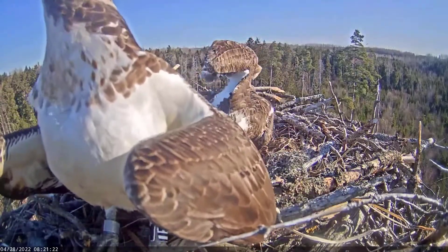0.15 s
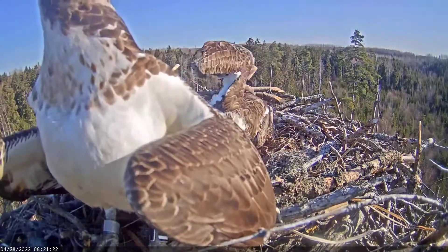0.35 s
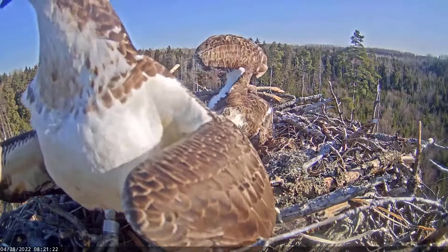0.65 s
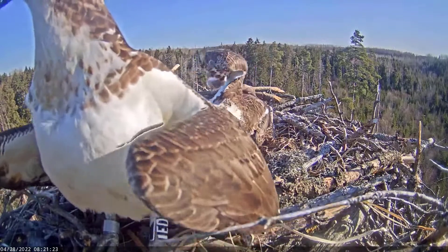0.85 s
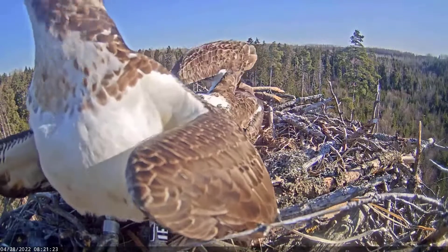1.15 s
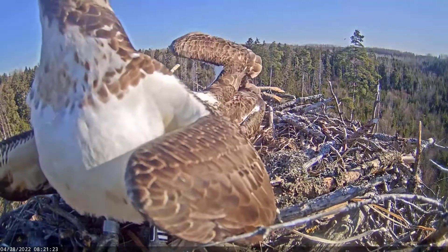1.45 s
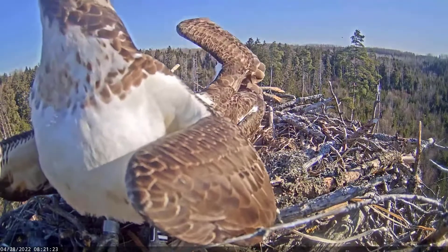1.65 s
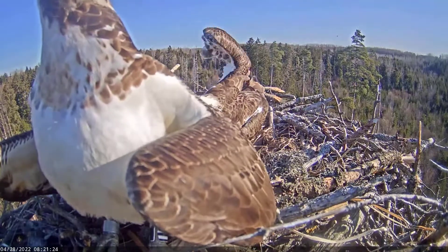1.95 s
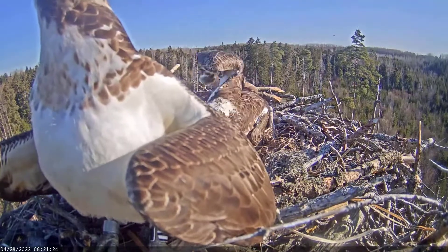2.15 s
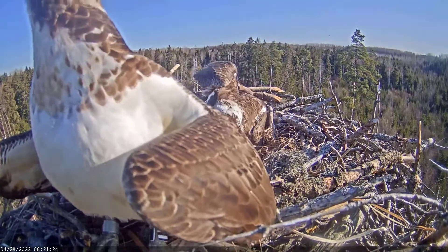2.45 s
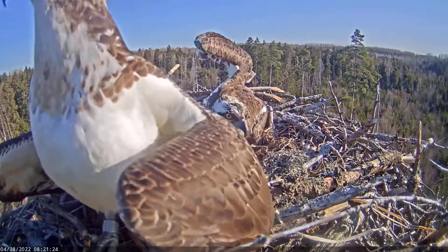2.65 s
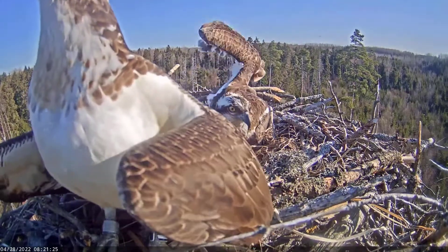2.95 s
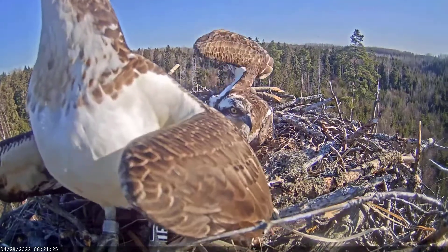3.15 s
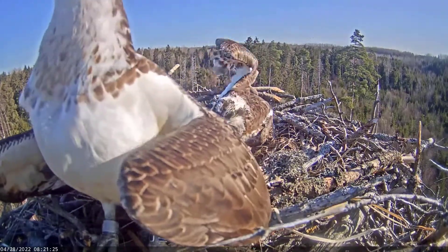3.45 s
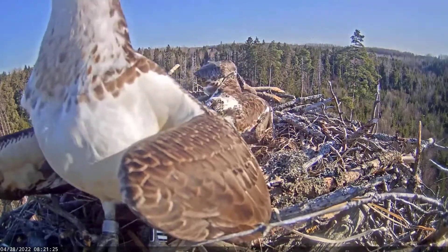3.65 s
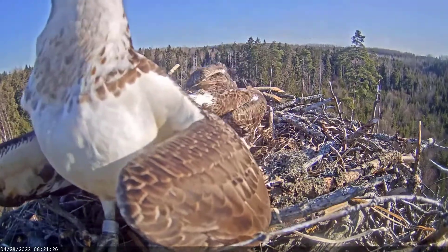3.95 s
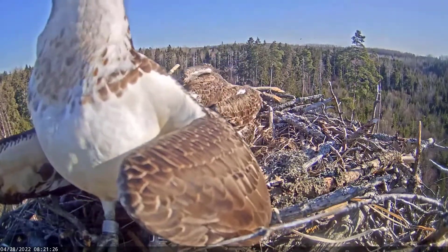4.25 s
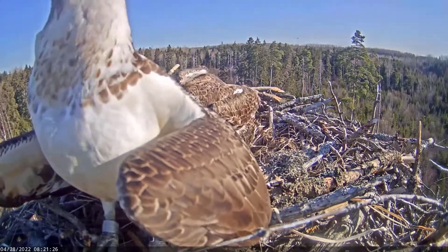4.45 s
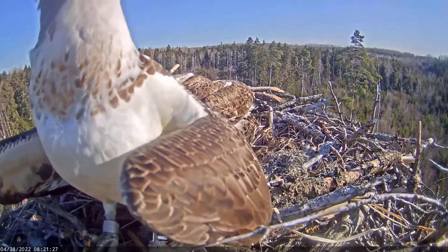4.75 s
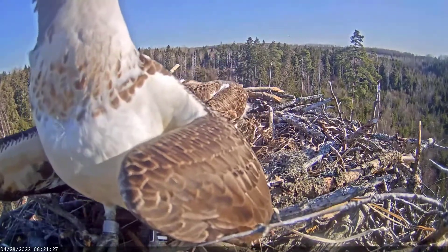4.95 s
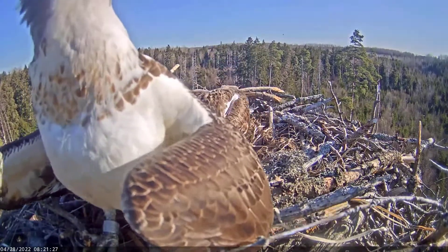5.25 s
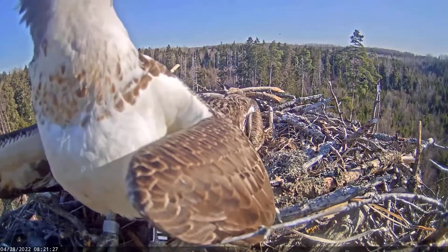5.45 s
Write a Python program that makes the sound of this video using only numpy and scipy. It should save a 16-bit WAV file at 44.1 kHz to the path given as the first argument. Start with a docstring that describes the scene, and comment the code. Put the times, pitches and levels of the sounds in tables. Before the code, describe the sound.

Outdoors on a treetop nest, wind thuds and rumbles on a close microphone, strongest in the first two seconds. A large bird gives a sharp falling whistle near one second, another near 2.65 followed by a softer rising reply, and a last near 4.7. Twigs snap and sticks tap, busiest from about 2.3 to 4.5 seconds, with faint chirps and scattered forest echoes.

```python
"""Ospreys on a treetop nest give sharp falling whistles, each a sliding near-sine tone with a weak octave.
The forest below throws them back as many scattered echoes; fainter notes, mostly small birds, mix in.
Wind buffets the microphone as shaped noise; dry twigs tick and sticks tap in short fading bursts.
A rough change of sample rate, which grabs stored samples as they are, mirrors every whistle."""
import sys
import numpy as np
from scipy import signal
from scipy.io import wavfile
from scipy.ndimage import uniform_filter1d

SR = 44100
rng = np.random.default_rng(int(sys.argv[2]) if len(sys.argv) > 2 else 0)


def wav_out(sig):
    """Save sig, one row per channel (or a flat mono array), as 16-bit PCM at SR to the path in sys.argv[1]."""
    wavfile.write(sys.argv[1], SR, np.round(np.clip(np.atleast_2d(sig).T, -1, 1) * 32767).astype(np.int16))


N = 246959


def gain_of(db):
    """Turn decibels into a plain multiplier."""
    return 10 ** (np.asarray(db) / 20)


def evened(x):
    """Scale a signal to an average (RMS) strength of 1."""
    return x / np.sqrt(np.mean(x ** 2) + 1e-20)


def smooth_random(count, size):
    """Random wandering, smoothed over a number of steps, with an RMS of 1."""
    return evened(uniform_filter1d(rng.standard_normal(count), size))


def read(points, hz):
    """Read a curve of values against pitch, drawn on a logarithmic pitch scale."""
    f, value = np.transpose(points)
    return np.interp(np.log(hz + 1), np.log(f + 1), value)


def add(mix, s, sound):
    """Mix a sound in from time s, cutting off what runs past the end."""
    part = mix[round(s * SR):][:len(sound)]
    part += sound[:len(part)]


def noise(spectrum, size, flicker_db, patchy_db, count=N):
    """Random short-time spectra; all bins flicker together, patches drift on their own."""
    frames, hz = 4 * count // size + 5, np.fft.rfftfreq(size, 1 / SR)
    real, imaginary, patches = rng.standard_normal((frames, len(hz), 3)).T
    patches = uniform_filter1d(patches, size=6, axis=0)  # across pitch
    patches = evened(uniform_filter1d(patches, size=10, axis=1))  # across time
    flicker = smooth_random(frames, 3)
    level_db = read(spectrum, hz)[:, None] + flicker_db * flicker + patchy_db * patches
    z = (real + 1j * imaginary) * gain_of(level_db)
    return evened(signal.istft(z, nperseg=size, noverlap=3 * size // 4)[1][:count])


# the forest's hush, its balance of low and high sound: (frequency [Hz], relative level [dB per Hz])
HUSH_COLOUR = [(180, -45), (300, -18.5), (555, -7.5), (614, -2), (828, -12.5), (1360, -18), (2740, -25),
               (3290, -23), (3640, -26), (3890, -25), (4520, -28), (12500, -30.5), (16000, -55.5)]
HUSH_DB = -66.5


def hush():
    """The forest's quiet, steady background is noise with a fixed colour and small random changes."""
    return gain_of(HUSH_DB) * noise(HUSH_COLOUR, size=1024, flicker_db=0.5, patchy_db=1.35)


RUSTLE_DB, RUSTLES_PER_S = -80, 80  # level of the smallest crackles, average rate


def rustle():
    """Tiny random crackles of the nest lining, a few much larger than the rest."""
    size_db = 3.0 * np.minimum(rng.exponential(1, N), 4)
    starts = gain_of(size_db) * (rng.random(N) < RUSTLES_PER_S / SR)
    fade = gain_of(-60 * np.arange(600) / SR / 0.019)  # 60 dB in 0.019 s
    crackles = signal.oaconvolve(starts, fade)[:N]
    band = signal.butter(2, [1400, 4500], "bandpass", fs=SR, output="sos")
    grit = signal.sosfilt(band, rng.standard_normal(N))
    return gain_of(RUSTLE_DB) * crackles * evened(grit)


TICK_S = 0.005  # time to fall 20 dB
# further faint ticks fall at random while the birds shift their feet
SHIFT_FROM_S, SHIFT_TO_S, FAINT_COUNT = 1.4, 5.1, 12
FAINT_TICK_DB, FAINT_SPREAD_DB = -61.5, 4  # before the lift in ticks(); full spread from faintest to loudest
# the main snaps of dry twigs, before the lift in ticks(): (time [s], level [dB])
TICKS = [(.1698, -58), (0.198, -60), (.545, -55.5), (0.901, -52), (1.465, -53), (1.771, -63), (2.37, -52.5),
         (2.383, -56.5), (2.5453, -57), (2.6207, -55), (2.7497, -58), (2.7686, -55), (2.8586, -48.5),
         (2.864, -51), (2.959, -53), (3.0632, -51.5), (3.072, -56), (3.2224, -56), (3.231, -52),
         (3.316, -57), (3.4203, -54), (3.4817, -48.5), (3.827, -57), (3.835, -55), (4.0857, -50),
         (4.262, -64), (4.319, -66), (4.3866, -55), (4.4134, -56.5), (4.419, -63.5), (4.4613, -60),
         (4.4688, -58), (4.6787, -54.5)]
# balance of low and high sound in a snap: (frequency [Hz], relative level [dB per Hz])
TICK_COLOUR = [(530, -42), (900, -16.5), (1220, -16.5), (2220, -4), (4920, -20), (6640, -11), (9770, -20),
               (11600, -9), (12900, -36.5), (15100, -29), (16000, -57.5)]


def ticks():
    """Dry twigs snap: a bright burst of noise that starts almost at once and dies quickly."""
    out, t = np.zeros(N), np.arange(1024) / SR
    when, size = rng.random((FAINT_COUNT, 2)).T
    when = SHIFT_FROM_S + (SHIFT_TO_S - SHIFT_FROM_S) * when
    faint_db = FAINT_TICK_DB + FAINT_SPREAD_DB * (size - .5)
    for s, db in [*TICKS, *zip(when, faint_db)]:
        snap = noise(TICK_COLOUR, size=128, flicker_db=2.5, patchy_db=2.5, count=1024)
        rise = np.minimum(t / 0.00062, 1)
        add(out, s, gain_of(db + 3.0 - 20 * t / TICK_S) * rise * snap)  # 3 dB lift
    return out


# the knocks of thicker sticks, before roughness: (time [s], level [dB], pitch [Hz])
TAPS = [(1.4651, -56, 1630), (1.7688, -48, 1610), (2.034, -55, 1930), (2.329, -49, 1855), (2.38, -51, 1820),
        (2.483, -48.5, 1930), (2.6193, -50, 1810), (2.7492, -42, 2200), (2.768, -52, 1530),
        (3.1138, -57, 1820), (3.1348, -57.5, 1790), (3.2221, -42.5, 1840), (3.423, -49, 1910),
        (3.4535, -51.5, 1770), (3.5598, -48, 1740), (3.5788, -47, 1830), (3.6345, -49, 1900),
        (3.697, -48.5, 2130), (3.705, -46, 1590), (3.8082, -58, 1680), (3.829, -50, 1800),
        (3.849, -44.5, 1630), (3.8794, -50, 1490), (3.929, -50, 1740), (3.9903, -49, 1750),
        (4.0323, -46, 1810), (4.0846, -46, 1880), (4.1607, -45.5, 1736), (4.229, -55, 1900),
        (4.3166, -52.5, 1400), (4.3818, -44.5, 1810), (4.413, -58, 1870), (4.73, -51, 1590)]


def taps():
    """Thicker sticks give a short hollow tap: a roughened sine that falls 60 dB in 0.015 s."""
    out, t = np.zeros(N), np.arange(1024) / SR
    for s, db, hz in TAPS:
        rough = .75 + .35 * smooth_random(len(t), 20)
        rise = np.minimum(t / .0008, 1)
        add(out, s, gain_of(db - 60 * t / .015) * rise * rough * np.sin(2 * np.pi * hz * t))
    return out


EDDY_DB, EDDY_S = 1.5, 0.042  # passing eddies lift and drop the whole wind; smoothing time
# strength of the wind before the eddies: (time [s], buffeting level [dB], flutter level [dB])
GUSTS = [(0, -30, -41), (.06, -21.5, -50.5), (.2, -27, -40.5), (.34, -23.5, -42), (.41, -20, -40),
         (.47, -25, -44), (.62, -25.5, -45), (.83, -25, -38.5), (1.0, -28.5, -36), (1.17, -26.5, -38.5),
         (1.31, -22.5, -38), (1.42, -25.5, -41), (1.61, -28.5, -45.5), (1.78, -21.5, -42.5),
         (1.839, -31.5, -43.5), (1.96, -22.5, -43.5), (2.07, -29, -47), (2.19, -24, -42.5),
         (2.3, -30.5, -48), (2.43, -27, -45.5), (2.58, -32.5, -51.5), (2.72, -29, -46), (3.12, -33, -52.5),
         (3.22, -31.5, -48), (3.35, -31.5, -52), (3.48, -29, -51), (3.63, -35, -57.5), (3.82, -30.5, -48),
         (4.051, -30.5, -49.5), (4.14, -27, -43), (4.46, -35, -54.5), (4.6, -27, -56), (4.69, -38.5, -52),
         (4.86, -37, -60), (5.08, -37.5, -63.5), (5.16, -44.5, -63), (5.6, -43, -62.5)]
# balance of the low buffeting: (frequency [Hz], relative level [dB per Hz])
BUFFET_COLOUR = [(4.7, -38.5), (8.0, 2.5), (21, 3), (35, 0.5), (124, -12), (254, -37), (300, -37),
                 (390, -61), (660, -120)]
# balance of the flutter above it: (frequency [Hz], relative level [dB per Hz])
FLUTTER_COLOUR = [(71, -26), (120, 3.5), (254, -14), (396, -18), (738, -34), (817, -34), (1820, -49.5),
                  (2200, -49.5), (2500, -53.5), (3250, -80.5), (5500, -120)]


def wind():
    """Eddies push the microphone's membrane in slow lumps; the flutter above comes in short puffs."""
    gust_s, *levels = np.transpose(GUSTS)
    buffet_db, flutter_db = (np.interp(np.arange(N) / SR, gust_s, level) for level in levels)
    span = int(EDDY_S * SR)
    eddies_db = EDDY_DB * evened(uniform_filter1d(smooth_random(N, span), span))
    lumps = noise(BUFFET_COLOUR, size=4096, flicker_db=0.0, patchy_db=1.5)
    puffs = noise(FLUTTER_COLOUR, size=512, flicker_db=3.5, patchy_db=1.0)
    return gain_of(eddies_db) * (gain_of(buffet_db) * lumps + gain_of(flutter_db) * puffs)


# single slaps of wind on the microphone, before the cut in slaps(): (time [s], level [dB])
SLAPS = [(0.034, -32), (0.082, -31), (0.173, -28), (0.302, -31), (0.345, -25.5), (0.403, -21.5),
         (0.608, -26.5), (0.829, -26), (1.233, -27), (1.433, -32), (1.465, -25), (1.53, -29.5),
         (1.575, -35.5), (1.766, -26), (2.099, -46), (2.142, -29.5), (2.702, -24), (3.211, -51),
         (3.704, -39), (3.95, -30.5), (4.007, -40.5), (4.319, -40)]
# balance of low and high sound in a slap: (frequency [Hz], relative level [dB per Hz])
SLAP_COLOUR = [(60, -12), (200, 6.5), (500, -3), (900, -19), (1600, -34), (3000, -38), (8000, -49)]


def slaps():
    """Each slap of wind is a short dull burst of noise, sharp in front, falling 60 dB in 0.021 s."""
    out, t = np.zeros(N), np.arange(1024) / SR
    for s, db in SLAPS:
        burst = noise(SLAP_COLOUR, size=256, flicker_db=0.5, patchy_db=4.0, count=1024)
        rise = np.minimum(t / 0.003, 1)
        add(out, s, gain_of(db - 2.0 - 60 * t / 0.021) * rise * burst)  # 2 dB cut
    return out


def note(rows, overtone_db, breath_db, clear_db=0, grain=12):
    """A near sine from the syrinx (a bird's voice organ), with a weak octave and a haze of air noise."""
    s, hz, db = np.transpose(rows)
    t = np.arange(s[0], s[-1], 1 / SR)
    hz = uniform_filter1d(np.interp(t, s, hz), size=90)
    phase = 2 * np.pi * np.cumsum(hz) / SR
    # a longer grain keeps the haze closer to the pitch
    haze = gain_of(breath_db) * evened(uniform_filter1d(smooth_random(len(t), grain), grain))
    octave = gain_of(overtone_db) / (1 + (hz / 4200) ** 8)  # the octave appears only low in the glide
    tone = (gain_of(clear_db) + haze) * np.sin(phase) + octave * np.sin(2 * phase)
    level = uniform_filter1d(np.interp(t, s, gain_of(db)), size=60)
    return s[0], np.sqrt(2) * level * tone * signal.windows.tukey(len(t), .05)


SWELL_DB, WAVER_DB = -19.5, 3  # a note swells from this far below its peak; waver, less for notes under 0.1 s


def phrase(start, length, first_hz, middle_hz, last_hz, db, place, fade_db):
    """Rows (s, Hz, dB) of a note: a pitch arc through three points; swell, peak, fade."""
    u = np.linspace(0, 1, 40)  # progress through the note
    hz = first_hz * (1 - u) * (1 - 2 * u) + 4 * middle_hz * u * (1 - u) + last_hz * u * (2 * u - 1)
    waver = WAVER_DB * smooth_random(len(u), 4) * min(length / .1, 1)
    shape_db = np.interp(u, [0, np.clip(place, .01, .99), 1], [SWELL_DB, 0, fade_db])
    return np.transpose([start + length * u, hz, db + shape_db + waver])


def trill(start, end, first_hz, last_hz, rate, depth_hz, db):
    """A whistle whose pitch warbles up and down; it sounds mostly at the turns and flutters on its way."""
    t = np.arange(0, end - start, 1 / SR)
    swing = np.sin(2 * np.pi * rate * t)
    hz = np.linspace(first_hz, last_hz, len(t)) + depth_hz * swing
    flutter = 1 + .35 * smooth_random(len(t), 160)
    shape = signal.windows.tukey(len(t), .25) * (.45 + .55 * swing ** 2) * flutter
    return start, gain_of(db) * shape * np.sin(2 * np.pi * np.cumsum(hz) / SR)


# faint chirp-like notes before waver, some perhaps mirrored sound; the 2.4 kHz note at 0.596 s has its
# strong octave as a row of its own, and the rise at 2.718 s is an osprey's short hook after its whistle:
# (time [s], length [s], first pitch [Hz], middle pitch [Hz], last pitch [Hz],
# peak level [dB], place of the peak [0-1], end level against the peak [dB])
CHIRPS = [ (0.197, .04, 5930, 5360, 5040, -69.5, .1, -4), (.235, .025, 5100, 4200, 3500, -72, .1, -3),
          (.26, 0.039, 3500, 3330, 3240, -76, .1, -7.5), (.405, 0.02, 3950, 3320, 2930, -59, 0.18, -11),
          (.513, .014, 5600, 4500, 3900, -77, .2, 0), (.527, 0.081, 3880, 3810, 3800, -77, .1, -4),
          (0.596, 0.14, 2484, 2370, 2330, -55.5, 0.03, -6.5), (0.615, 0.13, 4770, 4710, 4620, -64, 0.18, 1),
          (0.721, 0.028, 2330, 2910, 2940, -58.5, .1, 0), (.739, 0.011, 2920, 3800, 4700, -55, .1, 5.5),
          (0.719, .026, 4700, 5600, 5960, -63, 0.1, 2.5), (0.747, 0.048, 4720, 4810, 4855, -47, 0.04, -6),
          (.80, 0.1, 4820, 4810, 4800, -78, .05, -19), (.83, .04, 6100, 5330, 4900, -71, .3, -6),
          (1.208, .012, 8300, 7470, 7650, -63, .5, -18.5), (1.235, .025, 8430, 7620, 7200, -65.5, .3, -17),
          (2.582, .026, 3680, 3510, 3920, -58, 0.65, -20), (2.591, .03, 2130, 2900, 2890, -54.5, 0.44, -1),
          (2.631, .013, 4000, 3100, 2820, -46, 0.44, -12), (2.676, 0.025, 3760, 3830, 3600, -46.5, .4, -9),
          (2.718, 0.028, 2480, 2890, 3200, -41.5, 0.08, -18),
          (2.776, .04, 3190, 3520, 3950, -60.5, 0.2, -4), (2.822, 0.039, 2690, 3250, 3430, -52, 0, -16),
          (3.11, 0.11, 8130, 8270, 8300, -77.5, .12, -8), (3.227, 0.087, 4500, 6400, 7550, -73, 0, 1),
          (3.31, 0.031, 7500, 6300, 4380, -69, .1, -4), (3.25, .14, 8270, 8360, 8400, -79, .25, -5),
          (3.258, 0.078, 3690, 2470, 2090, -70.5, .3, -6), (4.06, .13, 8400, 7730, 7570, -78, .1, -5),
          (4.17, 0.19, 7900, 7880, 7900, -76.5, 0.03, -0.5), (4.22, .13, 7300, 7290, 7300, -80.5, .1, -4),
          (4.696, 0.033, 4200, 4170, 4140, -67, 0.84, -4.5), ]
# buzzy or hazy notes, and at 2.885 s the hazy falling echo of the rising whistle: columns as for CHIRPS
HAZY_NOTES = [(.378, 0.039, 2100, 2133, 2170, -46, 0.53, -30),
              (0.586, 0.067, 3560, 3560, 3346, -48, 1, -7.5), (.668, .072, 3420, 3450, 3430, -65, .1, -5),
              (2.885, 0.21, 2300, 2080, 1950, -50.5, 0.046, -15.5),
              (3.585, .10, 5030, 4920, 4910, -59, .2, -1), (3.59, .09, 5720, 5730, 5620, -61, .25, -6.5),
              (5.438, .11, 3560, 3940, 3550, -91, .5, -7.5)]
# warbling notes before shaping: (start time [s], end time [s], first pitch [Hz], last pitch [Hz],
# warbles [per s], warble depth [Hz], level [dB])
TRILLS = [(3.42, 3.56, 7700, 7500, 58, 420, -73), (3.47, 3.73, 3500, 3700, 72, 300, -67),
          (3.785, 3.86, 4300, 2500, 70, 330, -62), (5.42, 5.555, 3250, 3450, 15, 110, -76),
          (5.46, 5.525, 3850, 3820, 8, 160, -74)]


def faint_notes():
    """Fainter sounds, mostly small birds: gliding notes, hazes thick with air noise, warbling trills."""
    out = np.zeros(N)
    for row in CHIRPS:
        add(out, *note(phrase(*row), overtone_db=-35, breath_db=-9, grain=110))
    for row in HAZY_NOTES:
        grain = int(row[2] / 30)  # the lower the note, the wider its haze
        add(out, *note(phrase(*row), overtone_db=-40, breath_db=-3, clear_db=-3, grain=grain))
    for row in TRILLS:
        add(out, *trill(*row))
    return out


# the rising whistle of a bird below the nest, closer to the trees: columns as for CHIRPS
ANSWER = [(2.81, .085, 1860, 2150, 2330, -44, .65, -3)]


def answer():
    """A bird below the nest gives a rising whistle, a near sine with a little breath."""
    out = np.zeros(N)
    for row in ANSWER:
        add(out, *note(phrase(*row), overtone_db=-40, breath_db=-26.5))
    return out


# forest echoes, before colour: nest and trunk first, the treetops below swell later
# (delay time [s], level [dB])
FOREST = [(.02, -25), (.05, -25.5), (.075, -37.5), (.1, -43.5), (.17, -37), (.26, -44), (0.401, -52.5),
          (.55, -57.5), (.8, -67.5)]
# balance of low and high sound in the echoes: (frequency [Hz], level [dB])
ECHO_COLOUR = [(1500, 11), (2200, -8.5), (2700, -2), (3300, 4.5), (4500, 0), (7000, -1), (14000, -12)]


def forest(x):
    """Sparse reflections of random sign whose strength follows the delay; treble dies sooner."""
    delay, db = np.transpose(FOREST)
    at = np.arange(int(delay[0] * SR), int(delay[-1] * SR), 20)
    echoes = np.zeros(at[-1] + 20)
    spots = at + rng.integers(0, 20, len(at))  # one echo somewhere in every 20 samples
    echoes[spots] = rng.choice([-1., 1.], len(at)) * gain_of(np.interp(at / SR, delay, db))
    hz, t, z = signal.stft(echoes, SR, nperseg=256)
    # long paths lose treble
    leaves_db = -14.0 * np.maximum(t - .15, 0) * np.maximum(hz[:, None] / 1000 - 2.3, 0)
    coloured = z * gain_of(read(ECHO_COLOUR, hz)[:, None] + leaves_db)
    echoes = signal.istft(coloured, SR, nperseg=256)[1]
    return signal.fftconvolve(x, echoes)[:N]


# echoes off twigs and the other bird: (delay time [ms], level [dB])
NEST = [(2.3, -22.5), (4.8, -12), (7.7, -21.5), (11.5, -17)]


def nest(x):
    """A few close echoes beat against the gliding whistle and make it throb."""
    echoes = np.zeros(1024)
    echoes[0] = 1  # the direct sound
    for ms, db in NEST:
        echoes[round(ms * SR / 1000)] = gain_of(db)
    return signal.oaconvolve(x, echoes)[:N]


LIFT_S, EASE_S = 0.0042, .008  # the final lift grows over LIFT_S; the slide eases in over EASE_S
RASP_DB = 2.5  # the level breaks up while the pitch is still high


def whistle(effort, top_hz, rest_hz, slide_s, lift_hz):
    """Rows (s, Hz, dB) of a whistle: the pitch eases off its top, then relaxes exponentially to rest."""
    s, db = np.transpose(effort)
    t = np.arange(s[0], s[-1], 1 / 1000)
    height = np.exp((EASE_S - np.hypot(t - s[0], EASE_S)) / slide_s)  # 1 at the top, 0 at rest
    hz = rest_hz + (top_hz - rest_hz) * height + lift_hz * np.exp((t - s[-1]) / LIFT_S)
    rasp = RASP_DB * np.sqrt(height) * smooth_random(len(t), 3)
    return np.transpose([t, hz, np.interp(t, s, db) + rasp])


# each whistle slides from top to resting pitch, fast at first, and lifts at the end:
# (top pitch [Hz], resting pitch [Hz], slide time [s], final lift [Hz], octave level low in the glide [dB])
WHISTLES = [(7090, 2490, .016, 200, -16.5), (5915, 2280, 0.015, 10.1, -27.5), (6074, 2110, .016, 30, -28.5)]
# how hard the bird blows, before rasp, one table a whistle: (time [s], level [dB])
EFFORT = [
    [(.966, -48), (.971, -41.5), (.976, -45.5), (.98, -33), (.988, -38), (.992, -27.5), (1.003, -25),
     (1.007, -34.5), (1.012, -19.5), (1.021, -20), (1.031, -21), (1.036, -32), (1.041, -22), (1.051, -26),
     (1.056, -40.5)],
    [(2.636, -63), (2.642, -50), (2.648, -51), (2.658, -39), (2.672, -22.5), (2.687, -37.5), (2.692, -24.5),
     (2.700, -20.5), (2.708, -34), (2.716, -53)],
    [(4.724, -81), (4.729, -46.5), (4.745, -43.5), (4.75, -35), (4.757, -26), (4.768, -18.5),
     (4.786, -25.5), (4.801, -27.5), (4.806, -36.5), (4.81, -29), (4.825, -42.5), (4.83, -54)],
]
# the second half of the syrinx slides up to meet a whistle: columns as for CHIRPS
UPBEATS = [(2.649, 0.019, 2845, 3130, 3150, -24.5, 1, -3.5),
           (4.737, 0.019, 2760, 3002, 3210, -38, 0.21, 6.5)]


def ospreys():
    """The nest birds close by: falling whistles, and short upbeats from the syrinx's second half."""
    out = np.zeros(N)
    for effort, (*slide, octave_db) in zip(EFFORT, WHISTLES):
        add(out, *note(whistle(effort, *slide), octave_db, breath_db=-36.5, clear_db=1.04, grain=10))
    for row in UPBEATS:
        add(out, *note(phrase(*row), overtone_db=-28.5, breath_db=-35, grain=10))
    return out


def scene():
    """Mix all layers; ospreys, answer and faint notes each send their own share into the forest echoes."""
    near, below, faint = ospreys(), answer(), faint_notes()
    echoes = forest(gain_of(-16) * near + gain_of(3.0) * below + gain_of(-2.0) * faint)
    voices = nest(near) + below + faint + echoes
    return (voices + wind() + slaps() + ticks() + taps() + rustle() + hush())[None]


FIRST_SR, EDGE_HZ = 48000, 15800  # sample rate before the rough rate change [Hz]; treble cutoff [Hz]


def record(dry):
    """Grabbing stored samples leaves a sawtooth timing error: tones mirror about multiples of the rate gap."""
    taken = signal.resample_poly(dry, FIRST_SR // 300, SR // 300, axis=1)
    picked = taken[:, np.arange(N) * FIRST_SR // SR]  # the sample at or just before each moment
    picked = picked - .0043  # the converter sits slightly off zero
    lowpass = signal.firwin(511, EDGE_HZ, window=("kaiser", 9), fs=SR)
    return signal.oaconvolve(picked, lowpass[None], "same")


dry = scene()
out = record(dry)
wav_out(out)
```